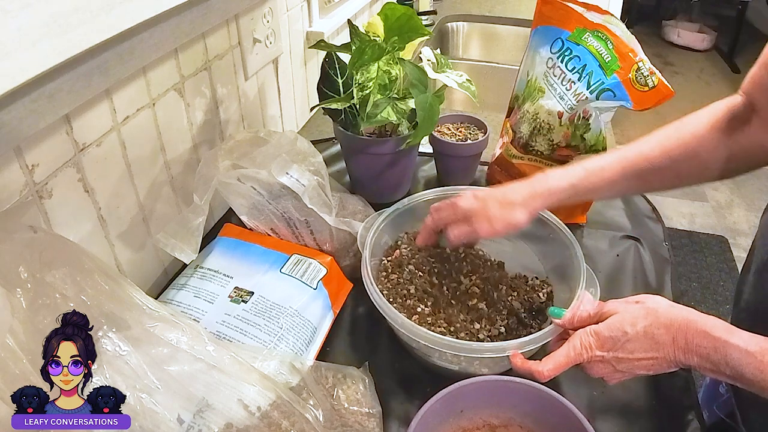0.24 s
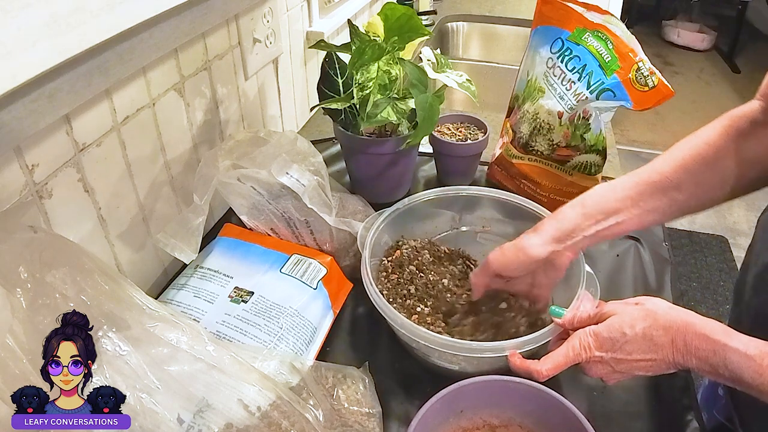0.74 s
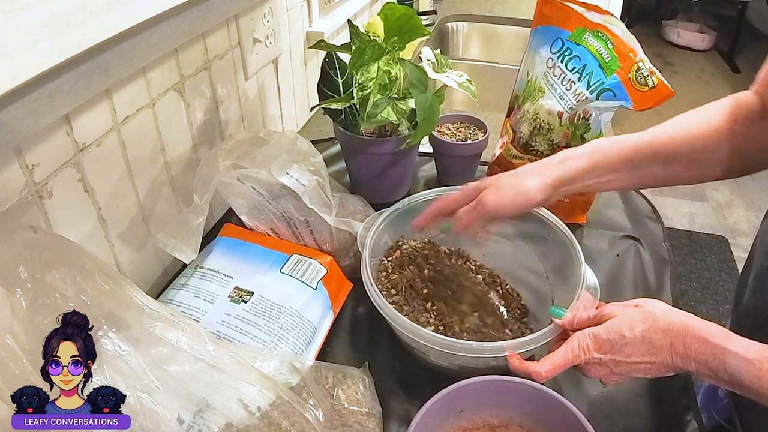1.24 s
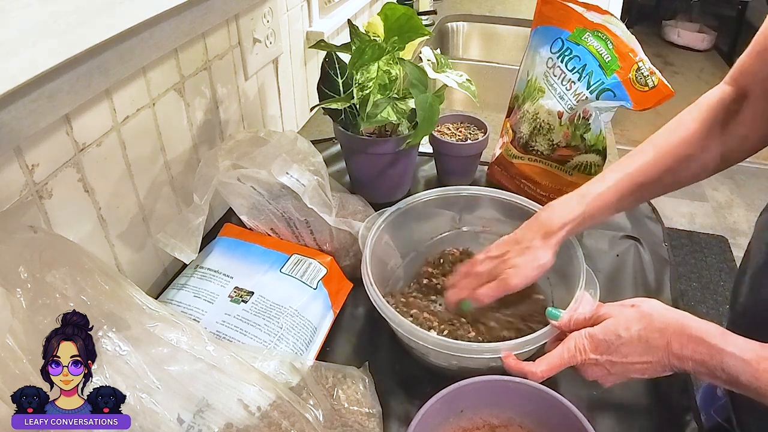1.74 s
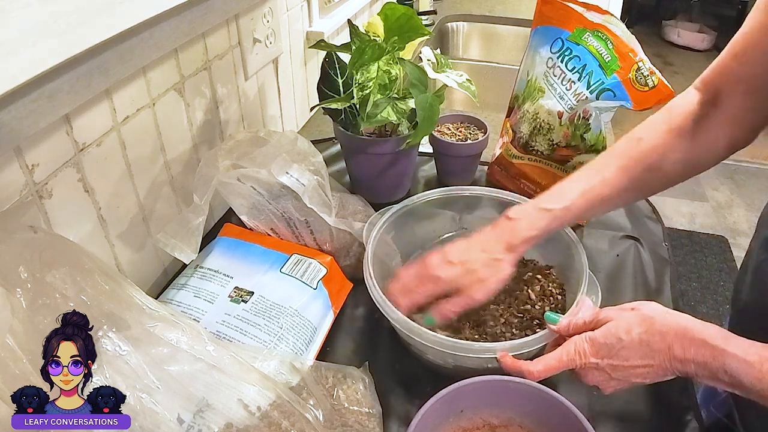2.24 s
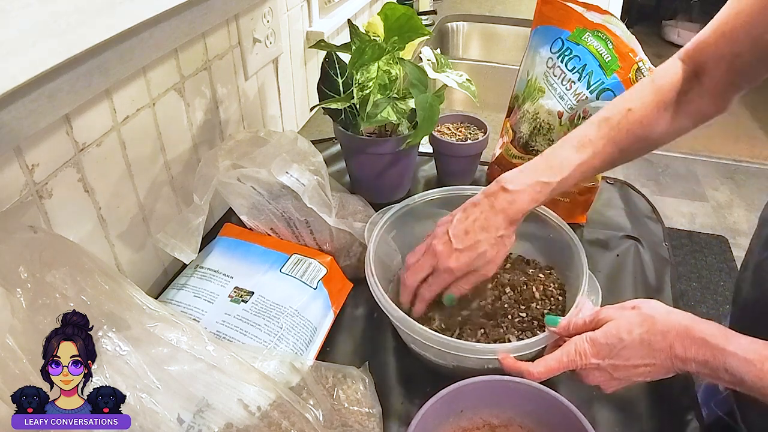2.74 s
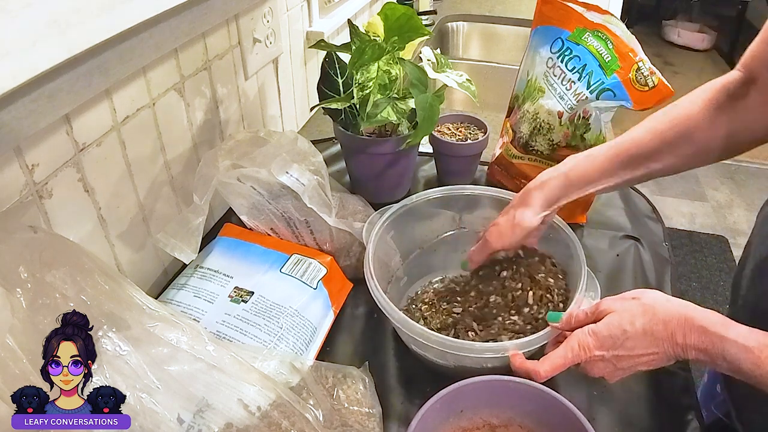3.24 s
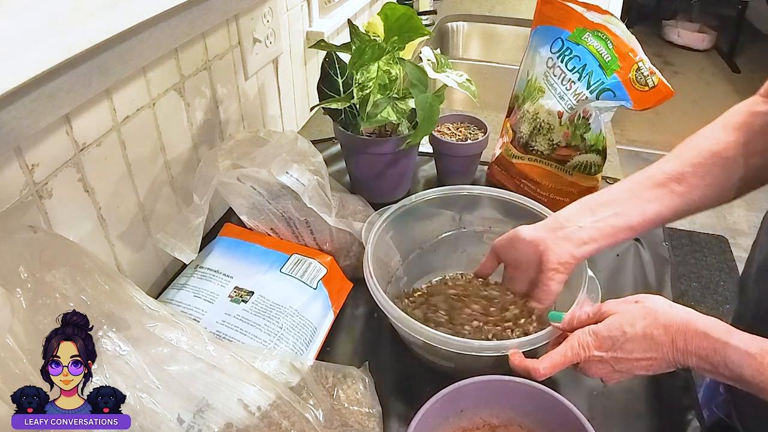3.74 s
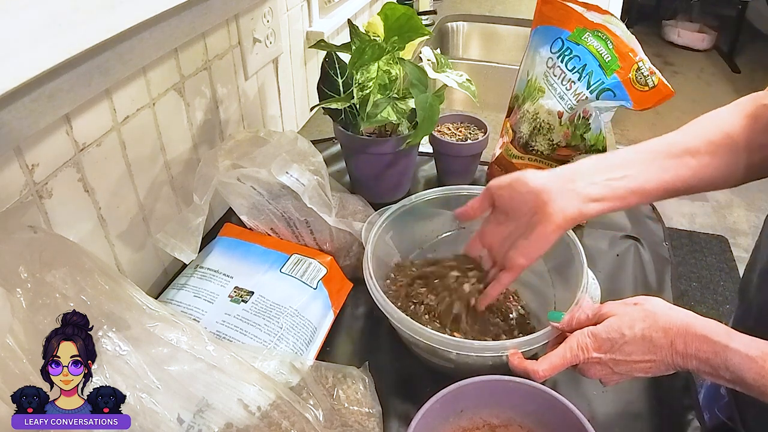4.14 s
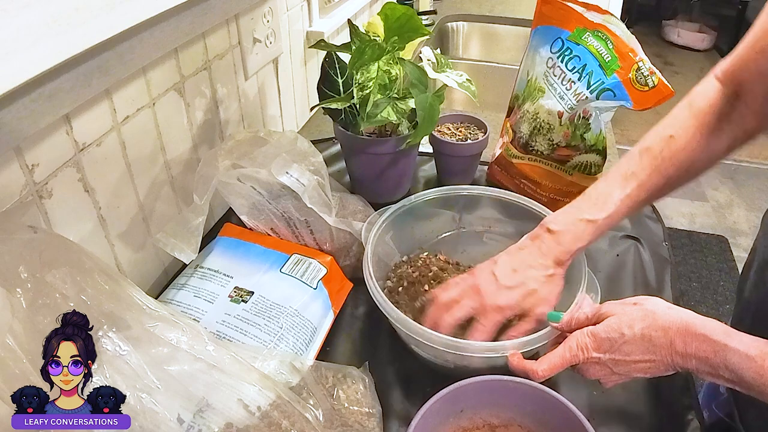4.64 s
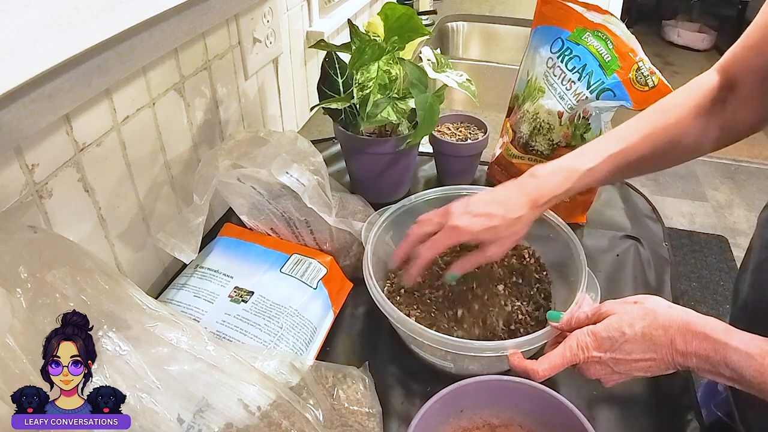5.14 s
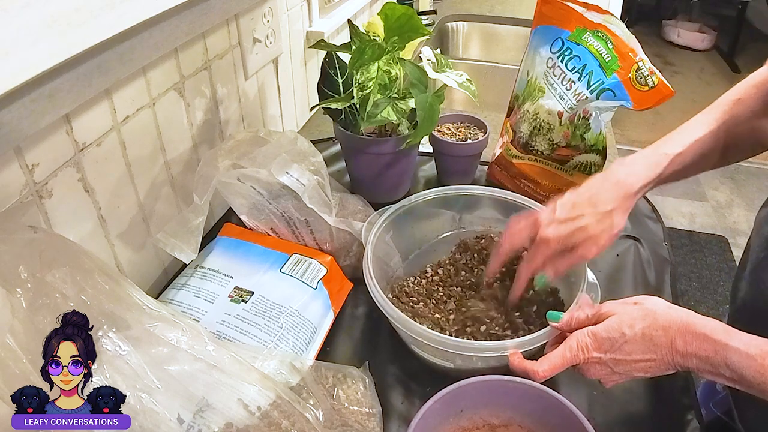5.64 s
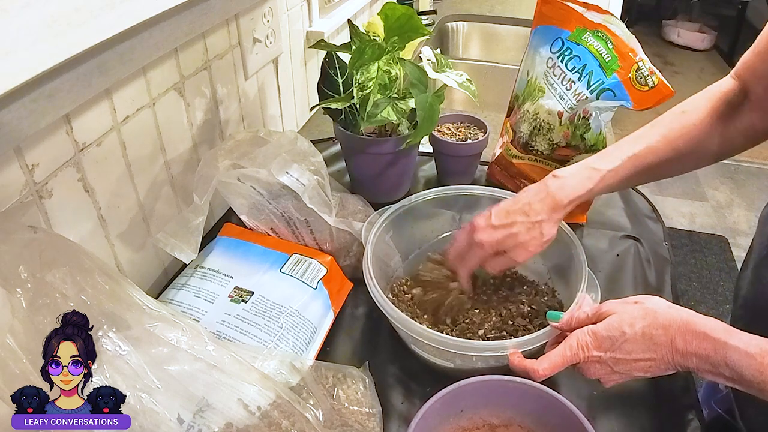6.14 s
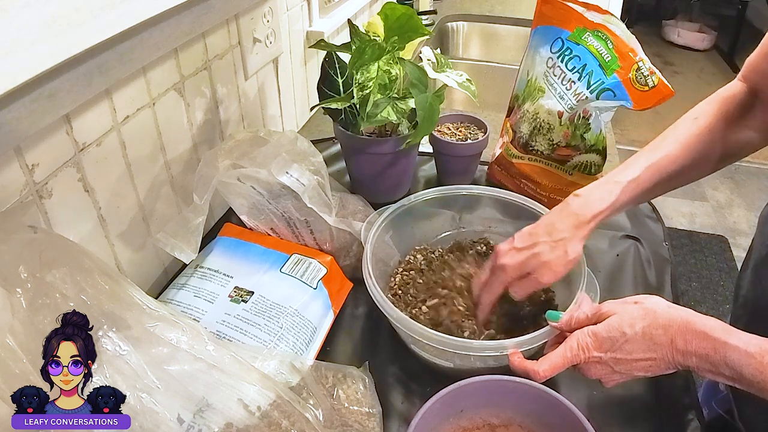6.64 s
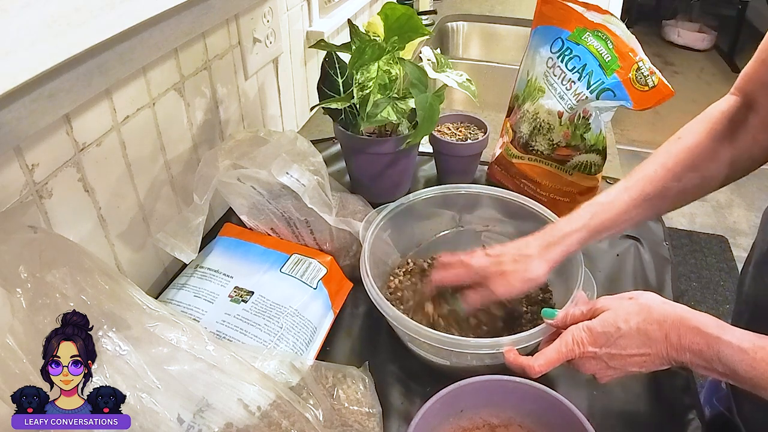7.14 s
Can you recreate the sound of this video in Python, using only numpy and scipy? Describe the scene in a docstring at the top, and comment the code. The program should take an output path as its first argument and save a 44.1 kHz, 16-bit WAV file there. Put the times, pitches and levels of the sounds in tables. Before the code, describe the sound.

In a quiet kitchen, heard close in stereo, a hand stirs small stones and grit in a thin plastic bowl. From 0 to 1 s, brisk scraping sweeps rattle and hiss, with hollow fingertip bumps and stones clicking on the wall. It thins until about 1.5 s, then a strong crunching sweep with loud knocks peaks near 1.7 s. Around 2 s grains trickle lightly, with a dull double thump at 2.2 s. From 2.4 to 3.7 s the gravelly scrape runs moderately and unevenly. Near 4 to 4.2 s a cluster of stones clatters sharply, then eases. Another clatter comes at 5 s, low thuds at 5.25 s, and the loudest stony burst at 5.6 s. Softer stirring follows, with a quick patter at 6.3 s, a heavy hollow bump at 7 s and final bright clicks near 7.4 s. Faint room murmur lies underneath.

```python
"""Small stones and grit, stirred by hand in a plastic bowl on a kitchen counter, heard close in stereo.
Grit is dense random noise contacts, coloured as rattle, hiss and wall ring, with pitched chinks on top.
Single stones are noise cracks through a resonance of their own, each with a spray of grit.
Pushes and fingertip bumps drum the bottom, the whole bowl and the counter: jolts through resonances, and
decaying sines. Filtered noise makes the quiet kitchen behind."""
import sys
import numpy as np
from scipy import signal
from scipy.fft import rfft, irfft, next_fast_len
from scipy.io import wavfile
from scipy.ndimage import map_coordinates

SR = 44100
rng = np.random.default_rng(int(sys.argv[2]) if len(sys.argv) > 2 else 0)


def inscribe(sig):
    """Save sig as 16-bit PCM at rate SR to the path in sys.argv[1].

    A 1-D sig is mono; a 2-D sig holds one channel per row.
    Samples are clipped to [-1, 1] before scaling.
    """
    pcm = np.round(np.clip(np.atleast_2d(sig).T, -1, 1) * 32767)
    wavfile.write(sys.argv[1], SR, pcm.astype(np.int16))


N = 325880

# murmur and hiss of the quiet kitchen: (frequency [Hz], relative level [dB])
AIR = [(18, -52), (30, -34), (69, 1), (110, -13), (140, -41.5), (250, -6.5), (330, -16.5), (480, -5),
       (660, -25.5), (3000, -28.5), (12000, -20), (15000, -61.5)]
AIR_DB = -59.5

# stereo likeness: (frequency [Hz], left-right correlation [-1 to 1])
ALIKE = [(30, .55), (80, .78), (150, .92), (350, .93), (700, .93), (1400, .58), (2800, .42), (6000, .4),
         (9000, .25), (15000, .2)]
# stereo balance: (frequency [Hz], left minus right [dB])
LEFT = [(60, .2), (200, .5), (700, -.5), (1400, .2), (2800, .9), (5600, 2.3), (10000, 2.1), (15000, .5)]
# stereo phase: (frequency [Hz], lead of left over right [rad])
LEAD = [(800, 0), (1300, .3), (3000, .7), (6000, .45), (9000, .8), (13000, 2.6)]
TOP_HZ = 15750  # band limit

# drumming of the bowl's bottom: (frequency [Hz], width [Hz], relative level [dB])
BOTTOM = [(243.4, 22.3, 0), (319, 28, 4.5), (410, 218, -4), (484, 33.5, 6.5), (560, 21, 1.5)]
# the whole bowl flexing under a heavy push: (frequency [Hz], width [Hz], relative level [dB])
FLEX = [(121, 67, -5), (152.6, 21, 5), (210, 64, -6)]
# drumming of the counter: (frequency [Hz], width [Hz], relative level [dB])
COUNTER = [(68.3, 4.7, 8), (107, 11, -10)]
# the hand leans on the bottom: (crest [s], bottom level [dB], climb [s], hold [s],
# flexing over bottom [dB], counter over bottom [dB])
PUSHES = [(0.0, -51, .01, 0.022, -19.5, -24), (0.167, -44.5, .025, 0.19, -8, -10),
          (0.415, -40.5, 0.077, 0.07, -23, -27), (0.538, -40.5, 0.14, 0.021, -3, -7),
          (0.685, -46, 0.13, .005, -8, -14), (0.84, -56, 0.064, 0.46, -18, -17),
          (1.396, -44.5, 0.026, 0.097, -6.5, -16), (1.574, -39, 0.094, .36, -12.5, -10),
          (2.205, -42.5, 0.008, 0.29, 3.5, -16), (2.82, -48.5, 0.037, .2, -8, -13),
          (3.07, -46, 0.3, 0.32, -31, -39), (3.485, -43.5, .04, .02, -25, -35),
          (3.597, -51.5, 0.095, 0.26, -35, -28), (4.22, -72, 0.22, 0.0055, -28, -21),
          (4.611, -45, 0.034, 0.22, -1, -7), (4.847, -50, 0.19, 0.045, -14, -18.5),
          (5.242, -41.5, .012, .02, -3, 1), (5.28, -44, 0.013, 0.1, -4, -1.5),
          (5.615, -55, 0.048, .005, -29, -6), (5.84, -50, 0.006, 0.17, 7.5, -1),
          (6.073, -42.5, 0.24, 0.017, -34, -30), (6.486, -46, 0.033, 0.26, -5.5, -22),
          (6.982, -38, 0.0081, 0.2, -7, -11)]
BOTTOM_SAG_DB_PER_S, FLEX_SAG_DB_PER_S, COUNTER_SAG_DB_PER_S = 39, 100, 64.5  # while it leans
RELEASE_DB_PER_S = 166  # after the hand lets go
COUNTER_LAG_S = 0.027
GRIND_DB = -26.5  # bottom under the rattle's own swell
FLEX_REST_DB, COUNTER_REST_DB = -73.5, -81  # bowl and counter at rest

# fingers bump the bottom: (time [s], level [dB], ring [Hz])
BUMPS = [(0.145, -23, 273), (0.328, -29.5, 260), (0.413, -23, 285), (0.494, -29, 312), (0.544, -27, 535),
         (1.378, -28.5, 306), (1.524, -34, 297), (1.709, -26, 493), (2.1965, -19, 572), (2.197, -20.5, 269),
         (2.205, -22, 191), (2.219, -24, 265), (2.812, -31, 250), (3.49, -26, 566), (4.601, -26, 227),
         (4.782, -41, 462), (5.237, -32, 500), (5.239, -26.5, 167), (5.2726, -18, 291), (5.29, -26, 298),
         (5.313, -25.5, 310), (5.835, -24, 180), (5.836, -41, 690), (6.058, -26, 378), (6.471, -27, 478),
         (6.975, -15, 290), (6.989, -29, 454)]
CRUNCH_DB = -9.5  # the load crushed under a fingertip, over the bump

# single stones that strike the wall: (time [s], ring level [dB], ring [Hz], treble over ring [dB])
STONES = [(0.026, -19, 2780, 4.5), (0.0722, -26.5, 1890, -9), (0.1109, -42, 1340, 11.5),
          (0.2203, -19, 2770, -1), (0.5544, -20, 1670, -26), (0.706, -23.5, 6000, -20),
          (0.828, -17, 2920, -6), (0.852, -15, 4300, -8), (0.8931, -19.5, 2240, -22),
          (1.0075, -31, 855, -23), (1.0078, -16.5, 1720, -6), (1.012, -25, 1690, -8),
          (1.1376, -24.5, 1490, -10), (1.138, -30, 650, -25), (1.144, -23, 2700, -6),
          (1.163, -30, 2030, -10), (1.2176, -37, 1980, -9), (1.2847, -33.5, 1410, 3.5),
          (1.3242, -34.5, 696, -25), (1.3245, -21.5, 1350, -21), (1.33, -32, 2160, -5),
          (1.342, -37, 2800, 1), (1.3783, -25.5, 2980, -5), (1.4166, -29.5, 2100, -9),
          (1.4391, -30, 3930, -1), (1.4636, -28, 3290, -6), (1.5213, -26, 1710, -8), (1.687, -16, 2140, 2),
          (1.694, -24, 1240, -19), (1.7175, -11, 940, -18), (1.818, -13.5, 2700, -2.5),
          (1.866, -19.5, 2670, 2.5), (1.9338, -18, 2100, 6.5), (1.9836, -20.5, 2050, 0),
          (2.004, -24.5, 3000, -8), (2.022, -34, 2300, -10), (2.0564, -28, 2900, -17),
          (2.0981, -32, 1600, -10), (2.138, -30, 2430, -4), (2.154, -27, 1500, -12),
          (2.1625, -32, 3140, 11), (2.172, -31.5, 1600, -10), (2.2045, -20, 2070, -4),
          (2.2344, -23, 1900, 3.5), (2.3555, -26, 1910, -8), (2.373, -20, 1530, -8), (2.63, -28, 2600, -3),
          (2.6334, -23, 2440, -10), (2.6482, -20.5, 2570, 1.5), (2.655, -27, 1950, -13),
          (2.6793, -32, 2620, -5), (2.754, -27, 2560, -5), (2.7906, -39, 1710, -5),
          (2.8184, -29, 2040, -12), (2.8733, -18.5, 1430, -7), (2.9342, -33, 2510, -12),
          (3.0395, -22, 2100, -10), (3.1572, -22, 1370, -12), (3.2319, -22, 1980, 1),
          (3.37, -29.5, 2420, 11), (3.4012, -20.5, 1450, -18), (3.451, -19, 2330, -16),
          (3.5792, -26, 1450, 11.5), (3.6016, -22, 1780, 0), (3.714, -26.5, 2540, 3),
          (3.7603, -24, 2650, -7), (3.8289, -24, 2500, 9), (3.841, -15.5, 2700, 0),
          (3.8466, -17, 1720, -2.5), (3.982, -12.5, 1800, 0.5), (4.039, -26, 2860, 5.5),
          (4.049, -20, 3320, -1), (4.0738, -15, 4400, 4.5), (4.0832, -12, 2920, -27),
          (4.106, -20, 2060, -2), (4.1343, -17, 2500, 7.5), (4.1499, -9.5, 2340, 1),
          (4.1596, -11.5, 2020, 0), (4.207, -26, 2480, -18), (4.2274, -15.5, 1770, 1.5),
          (4.2337, -17.5, 1870, -16), (4.2903, -33, 1610, -14), (4.349, -29.5, 2570, -5),
          (4.416, -27.5, 2780, -3), (4.4558, -27, 2340, -2), (4.4609, -20, 2470, -3),
          (4.472, -24.5, 2120, 6), (4.5358, -27, 2600, -1.5), (4.5577, -28, 2440, -3),
          (4.5936, -28.5, 2260, 4), (4.6428, -31, 2920, -1), (4.6784, -15, 2280, -1.5),
          (4.921, -14, 2760, -23), (4.9343, -10.5, 2720, -7), (4.9523, -15, 2500, -12),
          (4.9707, -12.5, 2710, 1), (4.985, -12.5, 3060, -9), (5.0123, -18, 1630, -13),
          (5.02, -10, 1850, -9), (5.0477, -22.5, 1820, -1), (5.1514, -31, 1720, -0.5),
          (5.24, -23, 1800, -13), (5.2722, -26, 2150, 1.5), (5.5624, -17, 2540, -3),
          (5.5679, -6.5, 2700, -8), (5.5832, -13, 1900, -9), (5.6027, -22, 2730, -4),
          (5.629, -12.5, 2540, -5), (5.6428, -17, 1990, 7), (5.807, -19.5, 3930, 4.5),
          (5.814, -25.5, 3770, 5), (5.837, -19, 3000, 3), (5.911, -28, 1550, -8), (6.01, -27, 1330, -11),
          (6.031, -23.5, 1250, -10), (6.0456, -14, 1340, -13), (6.132, -19, 2820, -2.5),
          (6.2118, -23.5, 2390, 1.5), (6.233, -28.5, 2450, 4), (6.268, -24.5, 2200, -2),
          (6.272, -23, 2600, -2), (6.2771, -15.5, 2340, 5.5), (6.282, -16.5, 2180, 1),
          (6.287, -16, 2190, 1), (6.296, -14.5, 3100, 5.5), (6.3904, -28, 2020, -17), (6.46, -30, 2000, -3),
          (6.4692, -25.5, 1200, -10), (6.4749, -15.5, 2040, -12), (6.748, -36, 3680, 7),
          (6.7687, -34.5, 4360, 5.5), (6.9758, -30, 1770, -11), (6.989, -22, 2670, -26),
          (7.0723, -24, 2050, 1), (7.149, -20.5, 2640, -18), (7.3128, -31, 2360, 3), (7.3267, -20, 2360, 0),
          (7.3385, -18, 2150, 3.5), (7.3765, -18, 2120, -2), (7.387, -11.5, 3600, -3.5)]
SPRAY_DB, SPRAY_SPREAD_DB = -6, 5.5  # grit thrown up after a stone: middle level, scatter
LOOSE = 70  # stones struck at random moments
LOOSE_DB, LOOSE_SPREAD_DB = 6, 3  # over the stirring; scatter
LOOSE_RING_HZ, LOOSE_TREBLE_DB = 2380, -6  # middle pitch; middle treble over ring

# sweeps of the hand and tumbling handfuls: (crest [s], rattle level [dB], climb [s], hold [s],
# fine grit over rattle [dB], wall over rattle [dB])
SWEEPS = [(0.0, -34.5, .01, 0.029, -1, -33), (0.228, -37, 0.12, 0.0086, -5, -12.5),
          (0.429, -37.5, 0.13, 0.052, -0.5, -7.5), (0.532, -29.5, 0.21, 0.048, -5.5, -11),
          (0.712, -27.5, 0.16, 0.015, -4.5, -12), (0.798, -32.5, 0.11, 0.13, -4, -12),
          (1.03, -39, 0.093, 0.045, -4, -14), (1.132, -41, 0.04, 0.086, -1.5, -16),
          (1.328, -44.5, 0.055, 0.01, -6, -1.5), (1.476, -44.5, 0.13, 0.056, 0, -11),
          (1.607, -35, 0.2, 0.035, -4, -7), (1.692, -26, 0.072, 0.025, -4.5, -4.5),
          (1.819, -29, 0.14, 0.097, -2.5, -12.5), (1.994, -43.5, 0.042, 0.02, 1, -21),
          (2.065, -47.5, .04, .08, -3, -6), (2.171, -45, 0.049, .03, 3.5, -1.5),
          (2.232, -43.5, 0.027, 0.045, -1.5, -5.5), (2.39, -33.5, 0.12, 0.049, -4, -7),
          (2.476, -43, 0.077, 0.07, -6.5, -11), (2.66, -39.5, 0.034, 0.0036, -5, -13),
          (2.807, -40, 0.056, 0.0045, 0.5, -13), (2.891, -35.5, 0.049, 0.41, -2, -9.5),
          (3.362, -34.5, 0.16, 0.11, -3.5, -7), (3.526, -36, 0.12, 0.16, -5.5, -5.5),
          (3.768, -33, 0.34, 0.1, -3.5, -9), (3.942, -35.5, 0.11, 0.29, -3, -12),
          (4.135, -30, 0.012, 0.088, -1, -24), (4.465, -45.5, 0.071, 0.0054, 0, -27),
          (4.588, -45.5, 0.17, 0.026, -2, -19), (4.698, -34, 0.09, .005, -3, -27),
          (4.886, -31, 0.38, 0.032, -3.5, -6.5), (4.957, -26.5, 0.067, 0.066, -2.5, -29),
          (5.279, -37.5, 0.028, 0.2, -4.5, -8.5), (5.5, -50, 0.073, 0.04, -1, 0),
          (5.58, -21.5, 0.033, 0.0076, -1.5, -15.5), (5.833, -38, 0.034, 0.022, 0.5, -21),
          (6.012, -34.5, 0.23, 0.1, -4.5, -5.5), (6.287, -31.5, 0.038, 0.0024, -0.5, -16.5),
          (6.474, -33, 0.013, 0.00086, -4, -3.5), (6.562, -44, .05, 0.067, -6, -5.5),
          (6.662, -38.5, 0.14, 0.0036, -2, -8), (6.99, -38, 0.0082, 0.18, -7, -9.5),
          (7.162, -43, 0.2, 0.065, 0, -2), (7.342, -34, 0.045, 0.022, -2, -10.5),
          (7.389, -37, 0.049, .01, -16, -27)]
SWEEP_SAG_DB_PER_S, SETTLE_DB_PER_S = 11, 187  # while the sweep holds; as the grit comes to rest
TRICKLE_DB, TRICKLE_DB_PER_S = -45, 29  # the last grains run on: under the sweep; their slower fall
CLIMB_POWER = 1.44  # a swell's gain grows as this power of the time since it began

# colour of the pebbles' rattle: (frequency [Hz], relative level [dB])
RATTLE = [(530, -78), (900, -7), (1160, -12.5), (1350, 5.5), (1460, 2.5), (1740, 10), (1840, 8), (2000, 7),
          (2740, 8), (4800, -8.5), (6240, -14), (10600, -120)]
# colour of the fine grit's hiss: (frequency [Hz], relative level [dB])
FINE = [(2120, -34.5), (3600, -8.5), (4830, -3.5), (8930, -3), (10100, -7), (11600, -13), (12600, -22.5),
        (13500, -26), (15600, -57)]
# modes of the thin wall: (frequency [Hz], width [Hz], relative level [dB])
WALL = [(662, 52, 4), (850, 67, 5.5), (1127, 230, 2.5)]
# higher wall modes: (frequency [Hz], width [Hz], relative level [dB])
RIM = [(1383, 32, 2.5), (1740, 125, 3), (2153, 20, -2.5), (2770, 30, 3.5), (3400, 114, -4.5)]
RIM_DB = -8  # higher wall modes over the rattle
CHINKS = 6000  # grains that chink
CHINK_DB, CHINK_SIZE_DB, CLUMP_DB = -4, 3.5, 2.5  # over the rattle; size scatter; clumping depth
CHINK_HZ, CHINK_SPREAD, CHINK_CYCLES = 2500, 0.454, 20  # middle pitch; log scatter; cycles to fall 60 dB


def amp(db):
    """dB to gain."""
    return 10 ** (np.asarray(db) / 20)


def unit(x):
    """Scaled to rms 1 over all channels."""
    return x / np.sqrt(np.mean(x ** 2) + 1e-20)


def along(points, hz):
    """Curve through (frequency, value) points on a log frequency axis."""
    f, v = np.transpose(points)
    return np.interp(np.log(hz + 1), np.log(f + 1), v)


def wobble(rate):
    """A smooth random curve, rate knots a second."""
    knots = rng.standard_normal(int(N * rate / SR) + 4)
    return map_coordinates(knots, [np.arange(N) * rate / SR])


def filtered(x, response):
    """x times a complex response of frequency."""
    m = next_fast_len(x.shape[-1] + SR // 10)
    spectrum = rfft(x, m) * response(np.fft.rfftfreq(m, 1 / SR))
    return irfft(spectrum, m)[..., :x.shape[-1]]


def modes(table):
    """The causal response of a set of resonances, alternating in sign."""
    def resonance(f, centre, width, db):
        return amp(db) * 1j * f * width / (centre * centre - f * f + 1j * f * width)
    return lambda f: sum((-1) ** k * resonance(f, *row) for k, row in enumerate(table))


def colour(points):
    """The gain of a spectrum, without phase shift."""
    return lambda f: amp(along(points, f))


def crack_and_tail(crack_s, tail_s, tail_db):
    """Envelope of one contact: a crack, then the bowl's hollow; each falls 60 dB in its own time."""
    t = np.arange(SR // 16) / SR
    return amp(-60 * t / crack_s) + amp(tail_db - 60 * t / tail_s)


def burst(crack_s, tail_s, tail_db):
    """Two unrelated noise answers to one contact, dying away together."""
    envelope = crack_and_tail(crack_s, tail_s, tail_db)
    return rng.standard_normal((2, len(envelope))) * envelope


def contacts(rate, spread_db, crack_s, tail_s, tail_db):
    """Crowded random contacts, mostly small; the powers of their cracks and tails add to shape noise."""
    chance, size = rng.random((2, N))
    crowd = np.exp(.3 * wobble(60))
    size_db = np.minimum(-spread_db * np.log(size + 1e-9), 18)
    hits = (chance < rate / SR * crowd) * amp(size_db)
    power = signal.oaconvolve(hits ** 2, crack_and_tail(crack_s, tail_s, tail_db) ** 2)[:N]
    return np.sqrt(np.abs(power)) * rng.standard_normal((2, N))


def swells(rows, over, sag_db_per_s, fall_db_per_s, lag_s=0):
    """Gain of a layer: each row climbs to its crest, holds while sagging, then dies; the powers add."""
    t = np.arange(0, N + 64, 32) / SR  # coarse steps, joined by straight lines
    crest, db, climb, hold = np.transpose(rows)[:4, :, None]
    after = t - crest - lag_s
    rise = 20 * CLIMB_POWER * np.log10(np.clip(1 + after / climb, 1e-4, 1))
    sag = sag_db_per_s * np.clip(after, 0, hold)
    fall = fall_db_per_s * np.maximum(after - hold, 0)
    level = db + np.reshape(over, (-1, 1)) + rise - sag - fall
    total = np.sqrt(np.sum(amp(level) ** 2, axis=0))
    return np.interp(np.arange(N) / SR, t, total)


def stirring(over=0):
    """How strongly the grit moves: the sweeps, and the trickle that outlasts them."""
    sweep = swells(SWEEPS, over, SWEEP_SAG_DB_PER_S, SETTLE_DB_PER_S)
    trickle = swells(SWEEPS, over, SWEEP_SAG_DB_PER_S, TRICKLE_DB_PER_S)
    return sweep + amp(TRICKLE_DB) * trickle


def kitchen():
    """Steady low murmur of the room and faint hiss: coloured noise."""
    return amp(AIR_DB) * unit(filtered(rng.standard_normal((2, N)), colour(AIR)))


def bottom():
    """The load grinds over the bottom in dense soft jolts; bottom, whole bowl and counter drum."""
    *_, flex_db, counter_db = np.transpose(PUSHES)
    lean = swells(PUSHES, 0, BOTTOM_SAG_DB_PER_S, RELEASE_DB_PER_S) + amp(GRIND_DB) * stirring()
    bend = swells(PUSHES, flex_db, FLEX_SAG_DB_PER_S, RELEASE_DB_PER_S) + amp(FLEX_REST_DB)
    shake = swells(PUSHES, counter_db, COUNTER_SAG_DB_PER_S, RELEASE_DB_PER_S, COUNTER_LAG_S)
    shake = shake + amp(COUNTER_REST_DB)
    jolts = contacts(rate=900, spread_db=3, crack_s=.008, tail_s=.06, tail_db=-12)
    drum = lean * unit(filtered(jolts, modes(BOTTOM)))
    flex = bend * unit(filtered(jolts, lambda f: modes(FLEX)(f) / (1 + 1j * f / 250)))
    # the heavy counter follows only the slowest part of the push
    counter = shake * unit(filtered(jolts, lambda f: modes(COUNTER)(f) / (1 + 1j * f / 90) ** 2))
    return drum + flex + counter


def bumps():
    """A fingertip gives one soft push that rings a few cycles, crunches the load and wakes the bottom's modes."""
    out, t = np.zeros(N + SR), np.arange(SR // 5) / SR
    for s, db, hz in BUMPS:
        tone = np.sin(2 * np.pi * hz * t)
        push = -tone * amp(-60 * t / 0.047) * (1 - np.exp(-t / 0.0024))
        ring = filtered(tone * amp(-60 * t / 0.0048), modes(BOTTOM))
        crunch = filtered(rng.standard_normal(len(t)) * amp(-60 * t / 0.037), modes([(597, 900, 0)]))
        bump = push + 0.069 * ring / np.abs(ring).max()
        bump = bump + amp(CRUNCH_DB) * crunch / np.abs(crunch).max()
        out[round(s * SR):][:len(t)] += amp(db) * bump
    return np.array([out[:N], 0.18 * out[:N]])


def loose_stones():
    """Rows like those of STONES at random moments, their level following the stirring around them."""
    when, size = rng.random((LOOSE, 2)).T
    pitch, treble = rng.standard_normal((LOOSE, 2)).T
    around_db = 20 * np.log10(stirring()[(when * N).astype(int)] + 1e-6)
    db = around_db + LOOSE_DB - LOOSE_SPREAD_DB * np.log(size + 0.2)
    return list(zip(when * N / SR, db, LOOSE_RING_HZ * np.exp(.3 * pitch), LOOSE_TREBLE_DB + 6 * treble))


def stones():
    """Each stone cracks on the wall with its own ring, its share of treble and a spray of grit after it."""
    out, lead = np.zeros((2, N + SR)), SR // 400  # room for the filters to swing in
    for s, db, hz, treble_db in STONES + loose_stones():
        spray_db = SPRAY_DB + SPRAY_SPREAD_DB * rng.normal()
        blow = burst(crack_s=0.0045, tail_s=0.043, tail_db=spray_db)
        # the contact itself is one hard push, off to one side
        blow[:, 0] = 2.17 * np.array([1, rng.normal()])
        blow = np.pad(blow, ((0, 0), (lead, 0)))
        own = modes([(hz, 1400, 3)])
        ring = filtered(blow, lambda f: own(f) ** 2 + amp(along(RATTLE, f) - 1.5))
        tick = filtered(blow, colour(FINE))
        pair = ring / np.abs(ring[0]).max() + amp(treble_db) * tick / np.abs(tick[0]).max()
        out[:, round(s * SR):][:, :pair.shape[1]] += amp(db) * pair
    return out[:, lead:N + lead]


def chinks():
    """Stone on stone: every grain rings a few cycles at a pitch of its own."""
    when, size, turn = rng.random((CHINKS, 3)).T[:, :, None]
    hz = CHINK_HZ * np.exp(CHINK_SPREAD * rng.standard_normal((CHINKS, 1)))
    hz = np.clip(hz, 700, 11000)
    k = np.arange(SR // 100)
    cycles = hz * k / SR
    size_db = -CHINK_SIZE_DB * np.log(size + 0.02)
    life = amp(size_db - 60 * cycles / CHINK_CYCLES) * (1 - np.exp(-cycles))
    at = ((when * N).astype(int) + k).ravel()

    def ringing(start):
        grains = life * np.sin(2 * np.pi * (cycles + start))
        return np.bincount(at, grains.ravel(), N)[:N]
    # the second part starts each grain at a random phase
    pair = np.array([ringing(0), ringing(turn)])
    clumped = amp(CLUMP_DB * wobble(35)) * pair
    # small grains send out no bass
    return unit(filtered(clumped, lambda f: 1 / (1 + (950 / (f + 1)) ** 4)))


def grit():
    """Pebbles rattle and ring the thin wall; far more numerous fine grains fuse to a hiss with ticks on it."""
    *_, fine_db, wall_db = np.transpose(SWEEPS)
    pebbles = unit(contacts(rate=3300, spread_db=4.5, crack_s=0.0018, tail_s=0.059, tail_db=-15.0))
    sand = unit(contacts(rate=7500, spread_db=2.5, crack_s=0.0083, tail_s=0.035, tail_db=-1.0))
    rattle = stirring() * unit(filtered(pebbles + 0.83 * sand, colour(RATTLE)))
    fine = stirring(fine_db) * unit(filtered(0.24 * pebbles + sand, colour(FINE)))
    wall = stirring(wall_db) * unit(filtered(0.43 * pebbles + sand, modes(WALL)))
    rim = amp(RIM_DB) * unit(filtered(pebbles, modes(RIM)))
    ringing = rim + amp(CHINK_DB) * chinks()
    return rattle + fine + wall + stirring() * ringing


def scene():
    """All sources as a shared and a differing part, then spread over the two microphone ports."""
    pair = kitchen() + bottom() + bumps() + stones() + grit()

    def likeness(f):
        turn = np.arccos(np.clip(along(ALIKE, f), -1, 1)) / 2
        return np.array([np.cos(turn), np.sin(turn)])

    def balance(f):
        # each side takes half of the level and phase difference
        half = amp(along(LEFT, f) / 2) * np.exp(.5j * along(LEAD, f))
        return np.array([half, 1 / half])

    mid, side = filtered(pair, likeness)
    return filtered(np.array([mid + side, mid - side]), balance)


def record(dry):
    """Nothing is kept above the band limit."""
    return filtered(dry, lambda hz: hz < TOP_HZ)


dry = scene()
out = record(dry)
inscribe(out)
```